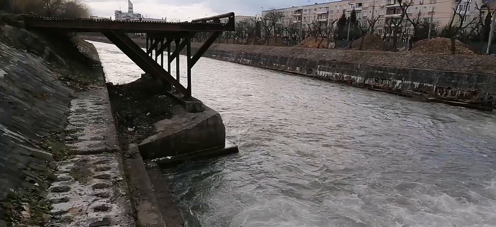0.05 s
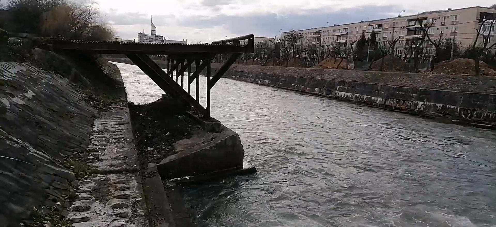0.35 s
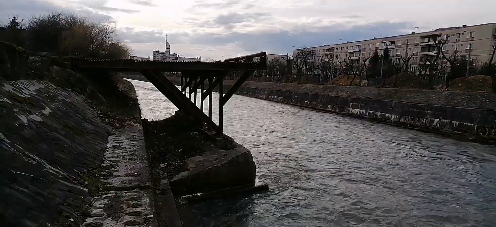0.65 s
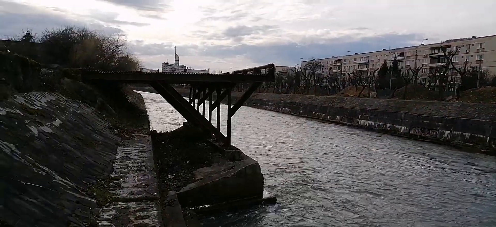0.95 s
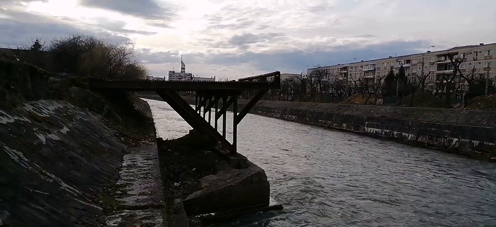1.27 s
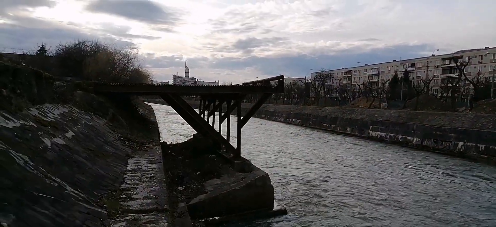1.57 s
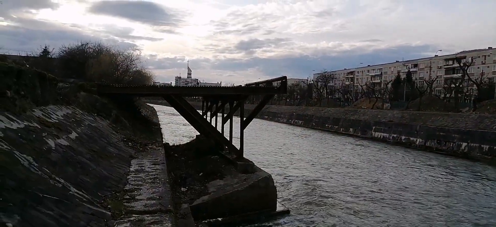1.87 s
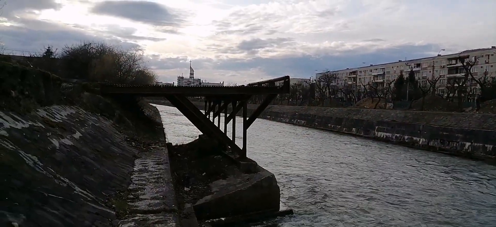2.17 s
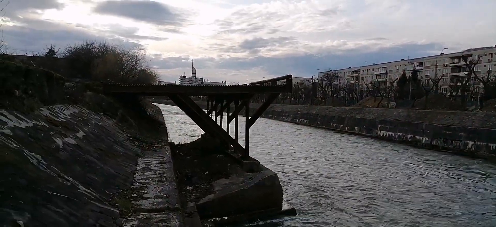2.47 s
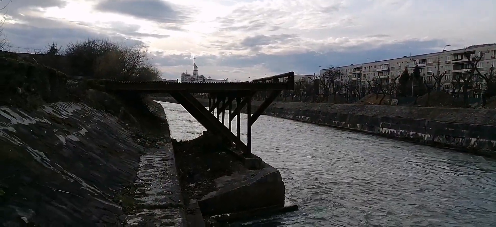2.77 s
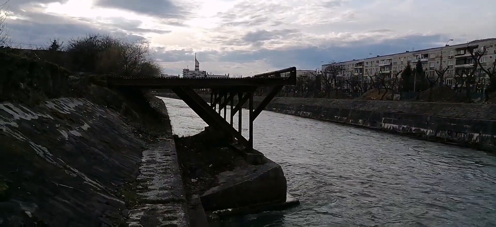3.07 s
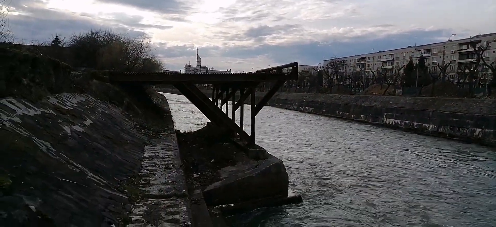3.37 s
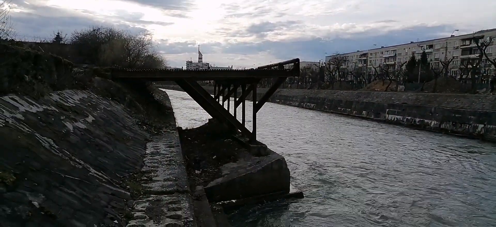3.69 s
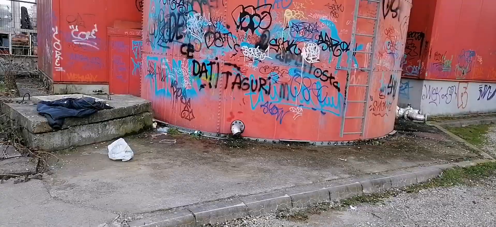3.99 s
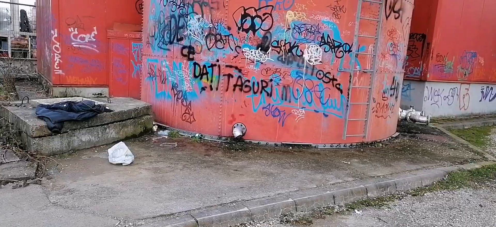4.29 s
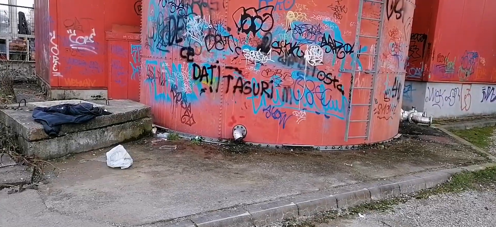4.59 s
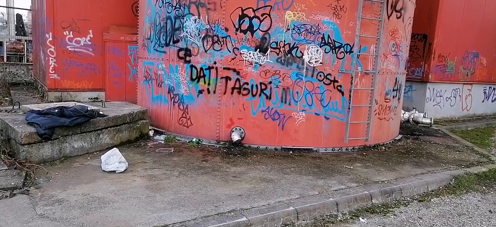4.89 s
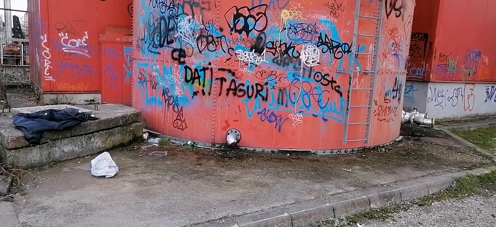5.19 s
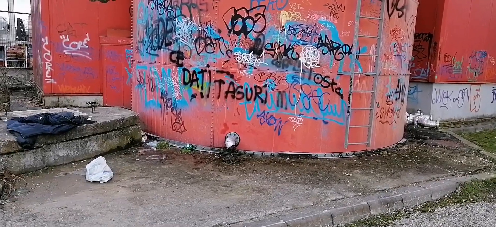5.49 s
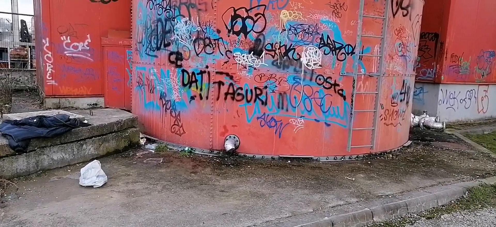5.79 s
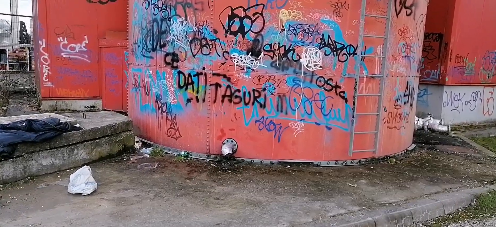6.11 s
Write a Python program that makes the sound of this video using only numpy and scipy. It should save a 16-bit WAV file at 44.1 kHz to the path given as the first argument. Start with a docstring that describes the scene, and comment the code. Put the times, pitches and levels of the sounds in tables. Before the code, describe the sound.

White water churns below a low river weir, a little to the right of a hand-held microphone on the bank. The steady rush carries fine fizzing and a few hollow gulps of trapped air, while a light breeze brushes the microphone. It cuts to a brief silence. Then, in an outdoor yard, a much quieter distant hiss comes from the left, swells briefly and settles, with a few faint ticks near the end.

```python
"""White water churns below a low river weir, to the right of a hand-held camera on the bank.
Foam rushes, trapped air gulps and fizzes, and a light breeze buffets the microphones.
After a short silence we stand in a yard beside a steel tank: a quiet, distant hiss from the left
and a few faint ticks; the camera's level swells briefly, then settles. The water and the hiss
are coloured by two small microphone ports, each with its own resonances."""
import sys
import numpy as np
from scipy import signal
from scipy.fft import rfft, irfft, next_fast_len
from scipy.io import wavfile
from scipy.ndimage import uniform_filter1d

SR = 44100
rng = np.random.default_rng(int(sys.argv[2]) if len(sys.argv) > 2 else 0)


def pcm_store(signal):
    """Save signal as 16-bit PCM."""
    levels = np.round(np.clip(np.atleast_2d(signal), -1, 1) * 32767)
    wavfile.write(sys.argv[1], SR, levels.astype(np.int16).T)


N = 275624
RIVER_SPAN_S, YARD_SPAN_S = (0, 3.757), (3.967, 6.26)

# Tone of the weir from the bank, in relative levels: frequency_hz, left_db, right_db
WEIR_SPECTRUM = [(20, -21, -24.5), (55, -11.5, -11), (140, -10, -1.5), (252, -11, -2), (394, -11, -2.5),
                 (576, -13, -0.1), (1068, -7.5, -6.5), (1430, -12.5, -9), (3010, -15.5, -14),
                 (4000, -18, -15.5), (6000, -19, -13), (9860, -21.5, -16), (11500, -27.5, -16.5),
                 (15000, -30, -23)]
# How the weir reaches the two ports: frequency_hz, likeness (0-1), left_lead_ms
WEIR_ARRIVAL = [(49.8, 0.7, -0.15), (230, 0.98, -0.32), (390, 0.72, -0.33), (590, 1, -0.36),
                (804, 0.5, -0.35), (1090, 0.99, -0.34), (1624, 0.65, -0.36), (2570, 0.55, -0.31),
                (3950, 0, -0.242), (8000, 0.03, -0.317)]
# Resonances of each microphone port: centre_hz, width_hz, gain_db
LEFT_PORT_RESONANCES = [(1120, 460, -1.5), (3160, 1100, 2.5), (3890, 640, -6), (7080, 510, -0.7),
                        (8780, 1200, 7.5)]
RIGHT_PORT_RESONANCES = [(3170, 1120, 5.5), (3815, 670, -7), (5500, 650, 1.6), (7110, 920, 8.5),
                         (8200, 660, -0.7)]
# The largest air pockets under the fall, at the right port: peak_s, pitch_hz, level_db, length_s
AIR_POCKETS = [(0.405, 253, -37, 0.031), (0.614, 430, -26.5, 0.013), (0.65, 413, -23, .012),
               (1.67, 165, -29.5, 0.041), (2.523, 320, -29, 0.034), (2.83, 264, -27, 0.018),
               (2.99, 267, -26, 0.034), (3.381, 511, -26, .014)]
# Gusts on the left port: peak_s, level_db
BREEZE_GUSTS = [(.45, -52), (.67, -51), (1.02, -52), (2.57, -50.5), (3.0, -49), (3.37, -45.5), (3.49, -44),
                (3.68, -43.5)]
# Tone of the distant hiss from the yard, in relative levels: frequency_hz, left_db, right_db
HISS_SPECTRUM = [(20, -18.3, -24), (55, -6, -7), (181, -0.5, -9.5), (400, -7, -14.4), (646, -6, -18),
                 (1010, -11.5, -13), (1400, -14.5, -22), (2290, -15, -20), (3900, -22, -18),
                 (5300, -20.5, -21.5), (6000, -23, -26), (8600, -21.5, -25), (10600, -26, -32.5),
                 (15000, -36.5, -32.5)]
# How the hiss reaches the two ports: frequency_hz, likeness (0-1), left_lead_ms
HISS_ARRIVAL = [(50, 0.75, 0.38), (220, 0.89, 0.28), (480, 0.58, 0.43), (750, 0.75, 0.35),
                (1200, 0.82, 0.46), (2500, 0.7, 0.46), (4200, .74, 0.51), (5070, 0.47, 0.513),
                (6100, 0, 0.476), (7100, 0.5, 0.45), (8700, 0.44, 0.475), (10500, 0.1, .465),
                (13000, .33, .46)]
# Faint ticks in the yard: start_s, level_db, pitch_hz, t60_s
YARD_TICKS = [(5.312, -42, 9500, 0.0072), (6.081, -46, 12200, .012), (6.1365, -37, 3100, 0.011),
              (6.1835, -41, 955, .014), (6.198, -41, 1300, 0.007)]


def gain_of(db):
    """Decibels to an amplitude factor."""
    return 10 ** (np.asarray(db) / 20)


def unit_rms(x):
    """The signal scaled to rms 1."""
    return x / np.sqrt(np.mean(x ** 2) + 1e-20)


def columns_at(table, hz):
    """A table's columns, interpolated over log frequency."""
    table_hz, *columns = np.transpose(table)
    return np.array([np.interp(np.log(hz + 1), np.log(table_hz), column) for column in columns])


def during(span_s):
    """One inside the span, zero outside."""
    t = np.arange(N) / SR
    return (t >= span_s[0]) & (t < span_s[1])


def add(mix, start_s, sound):
    """Mixes a sound in at start_s."""
    part = mix[round(start_s * SR):][:len(sound)]
    part += sound[:len(part)]


def through_ports(noises, spectrum, arrival):
    """Two unrelated noises reach the microphones partly alike, one port late, both coloured; rms 1."""
    size = next_fast_len(N)
    hz = np.fft.rfftfreq(size, 1 / SR)
    right, unrelated = rfft(noises, size)
    likeness, left_lead_ms = columns_at(arrival, hz)
    left = likeness * right + np.sqrt(1 - likeness ** 2) * unrelated
    left *= np.exp(2j * np.pi * hz * left_lead_ms / 1000)
    port_db = [sum(db / (1 + (2 * (hz - centre) / width) ** 2) for centre, width, db in port)
               for port in (LEFT_PORT_RESONANCES, RIGHT_PORT_RESONANCES)]
    colour = gain_of(columns_at(spectrum, hz) + port_db)
    return unit_rms(irfft(np.array([left, right]) * colour, size)[:, :N])


def churning(patch_db, surge_db, patch_frames, patch_bins):
    """Two white noises that flicker together in patches of time and pitch, and in broad surges."""
    frames, bins = N // 128 + 5, 257
    real_a, imag_a, real_b, imag_b, patches = rng.standard_normal((5, frames, bins))
    patches = uniform_filter1d(patches, patch_frames, axis=0)
    patches = unit_rms(uniform_filter1d(patches, patch_bins, axis=1))
    surges = unit_rms(uniform_filter1d(rng.standard_normal(frames), size=30))[:, None]
    spectra = np.array([real_a + 1j * imag_a, real_b + 1j * imag_b])
    spectra *= gain_of(patch_db * patches + surge_db * surges)
    _, noises = signal.istft(spectra.swapaxes(1, 2), nperseg=512, noverlap=384)
    return unit_rms(noises[:, :N])


def bubbles(low_hz, high_hz, per_s, cycles, rise, spread_db, sizes):
    """Trapped air: each bubble rings for a few cycles and rises in pitch as it nears the surface."""
    out = np.zeros(N)
    for hz in np.geomspace(low_hz, high_hz, sizes):
        age = np.arange(int(5 * cycles / hz * SR)) * hz / cycles / SR  # in decay times
        envelope = hz * (1 - np.exp(-10 * age)) * np.exp(-age)
        ring = envelope * np.sin(2 * np.pi * cycles * age * (1 + rise * age))
        strengths = gain_of(spread_db * np.minimum(rng.exponential(1, N), 3))
        onsets = rng.random(N) < per_s / sizes / SR
        out += signal.oaconvolve(strengths * onsets, ring)[:N]
    return unit_rms(out)


def weir(level_db, hollow_hz, hollow_width_hz):
    """Off to the right: a steady rush of foam, air dragged under the fall, fine bubbles nearer by."""
    rush = churning(patch_db=0.76, surge_db=0, patch_frames=14, patch_bins=5)
    gulps = bubbles(low_hz=142.8, high_hz=914, per_s=200, cycles=2.53, rise=0.012, spread_db=2, sizes=18)
    fizz = np.array([bubbles(low_hz=984, high_hz=12070, per_s=1800, cycles=3, rise=0.013,
                             spread_db=3.5, sizes=14) for _ in range(2)])
    water = rush + gain_of(-10.5) * fizz
    water[0] += gain_of(-21) * gulps  # from one direction, so both ports share them
    hollow = signal.iirpeak(hollow_hz, hollow_hz / hollow_width_hz, fs=SR)
    water += gain_of(-7.5) * signal.lfilter(*hollow, water)  # the hollow under the falling sheet booms
    return gain_of(level_db) * through_ports(water, WEIR_SPECTRUM, WEIR_ARRIVAL)


def big_gulps(left_db, left_lag_ms):
    """Air pockets collapse under the fall: a few cycles swell and die, later and weaker on the left."""
    out = np.zeros((2, N))
    t = np.arange(SR // 8) / SR
    for peak_s, hz, db, length_s in AIR_POCKETS:
        rise_s = length_s / 4
        envelope = (t / rise_s * np.exp(1 - t / rise_s)) ** 2
        gulp = gain_of(db) * envelope * np.sin(2 * np.pi * (hz * t + rng.random()))
        add(out[0], peak_s - rise_s + left_lag_ms / 1000, gain_of(left_db) * gulp)
        add(out[1], peak_s - rise_s, gulp)
    return out


def breeze(draught_db, gust_half_width_s, corner_hz, right_db):
    """Wind on the microphones: low eddies, unrelated at the two ports; the right one is sheltered."""
    t = np.arange(N) / SR
    gusts = sum(gain_of(db) * np.exp(-((t - peak_s) / gust_half_width_s) ** 2)
                for peak_s, db in BREEZE_GUSTS)
    band = signal.butter(2, [corner_hz / 3, corner_hz], "bandpass", fs=SR, output="sos")
    eddies = unit_rms(signal.sosfilt(band, rng.standard_normal((2, N))))
    return (gain_of(draught_db) + gusts) * eddies * gain_of([[0], [right_db]])


def distant_hiss(level_db, fade_db_per_s, split_hz):
    """A smooth, slowly fading hiss far to the left; the camera's level swells briefly, then settles."""
    t = np.arange(N) / SR - YARD_SPAN_S[0]
    rush = churning(patch_db=0.68, surge_db=0.25, patch_frames=20, patch_bins=7)
    hiss = through_ports(rush, HISS_SPECTRUM, HISS_ARRIVAL)
    body = signal.sosfiltfilt(signal.butter(4, split_hz, fs=SR, output="sos"), hiss)
    treble = hiss - body
    body *= swell(t, height_db=4.4, rise_s=0.092, hold_s=0.22, release_s=0.13)
    treble *= swell(t, height_db=4.3, rise_s=0.096, hold_s=0.12, release_s=0.13)  # settles first
    return gain_of(level_db - fade_db_per_s * t) * (body + treble)


def swell(t, height_db, rise_s, hold_s, release_s):
    """A gain that rises from one, holds and falls back."""
    corners_s = np.cumsum([0, rise_s, hold_s, release_s])
    return gain_of(np.interp(t, corners_s, [0, height_db, height_db, 0]))


def lingering_band(span_s, level_db, band_hz):
    """A faint narrow band of hiss near 2.2 kHz lingers as the swell settles."""
    arch = np.sin(np.interp(np.arange(N) / SR, span_s, [0, np.pi]))
    band = signal.butter(2, band_hz, "bandpass", fs=SR, output="sos")
    return gain_of(level_db) * arch * unit_rms(signal.sosfilt(band, rng.standard_normal(N)))


def ticks():
    """Small ticks in the centre, perhaps grit underfoot: each rings one short mode."""
    out = np.zeros(N)
    t = np.arange(SR // 20) / SR
    for start_s, db, hz, t60_s in YARD_TICKS:
        decay = np.exp(-np.log(1000) * t / t60_s)
        add(out, start_s, gain_of(db) * decay * np.sin(2 * np.pi * hz * t))
    return out


def scene():
    """On the river bank, a moment of silence, then in the yard beside the tank."""
    bank = weir(level_db=-32.5, hollow_hz=248, hollow_width_hz=37)
    bank += big_gulps(left_db=-14, left_lag_ms=0.3)
    bank += breeze(draught_db=-64.5, gust_half_width_s=0.044, corner_hz=81.2, right_db=-9.5)
    yard = distant_hiss(level_db=-44.5, fade_db_per_s=0.7, split_hz=2200)
    yard += lingering_band(span_s=(4.17, 4.39), level_db=-56, band_hz=(1960, 2600))
    yard += ticks()
    return during(RIVER_SPAN_S) * bank + during(YARD_SPAN_S) * yard


def record(dry):
    """The camera cuts off the treble above 15.4 kHz."""
    lowpass = signal.firwin(511, 15400, window=("kaiser", 9), fs=SR)
    return signal.oaconvolve(dry, lowpass[None], "same")


dry = scene()
out = record(dry)
pcm_store(out)
```